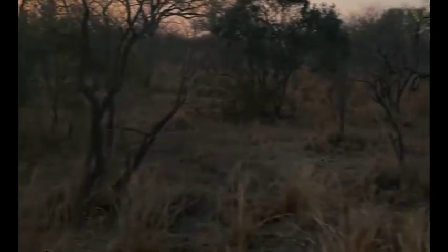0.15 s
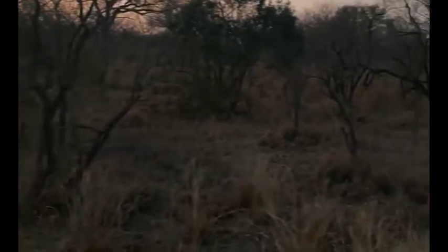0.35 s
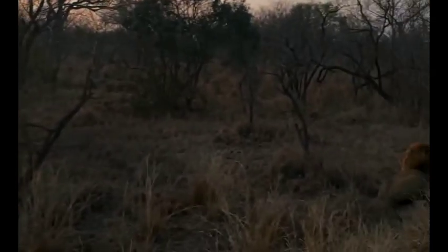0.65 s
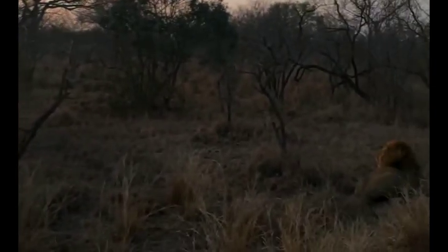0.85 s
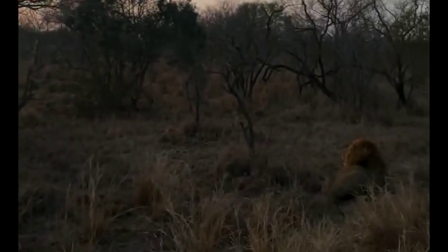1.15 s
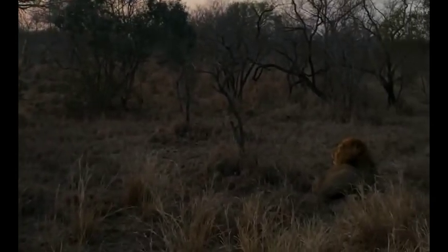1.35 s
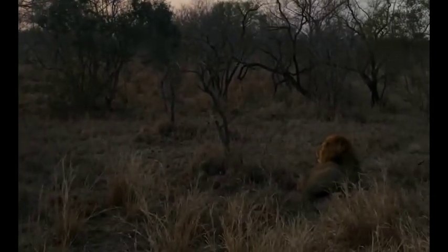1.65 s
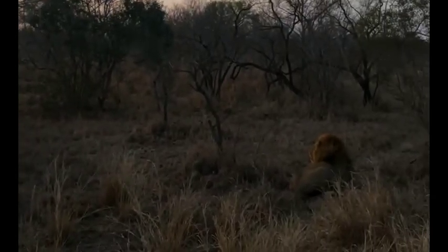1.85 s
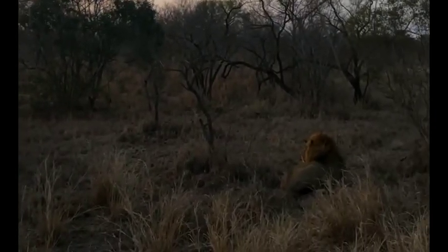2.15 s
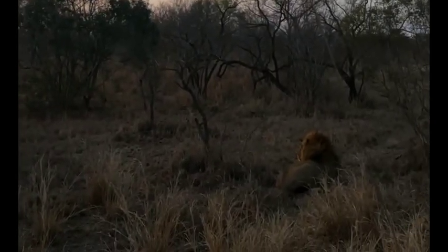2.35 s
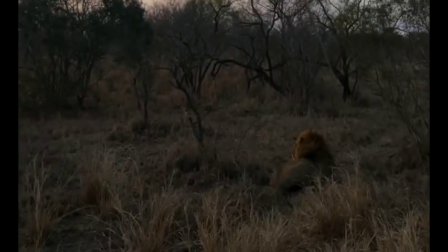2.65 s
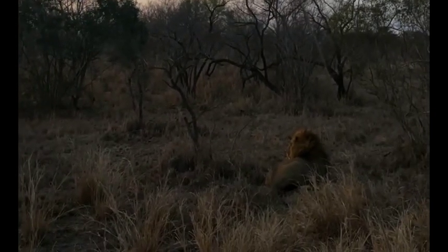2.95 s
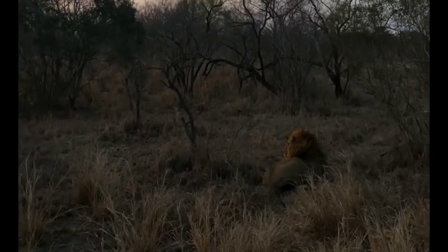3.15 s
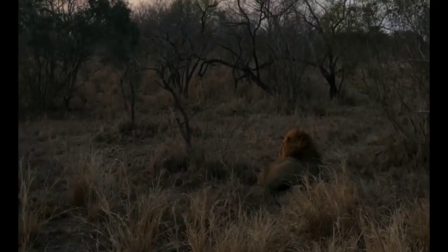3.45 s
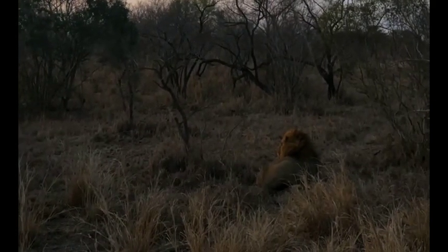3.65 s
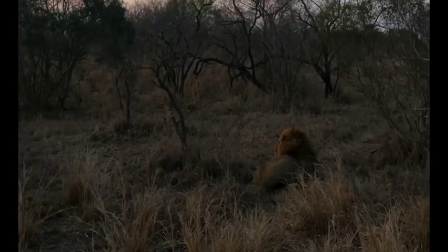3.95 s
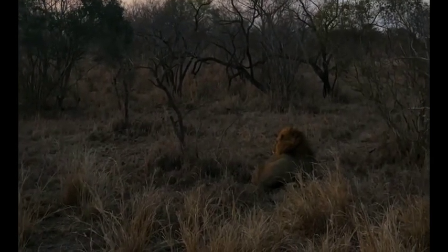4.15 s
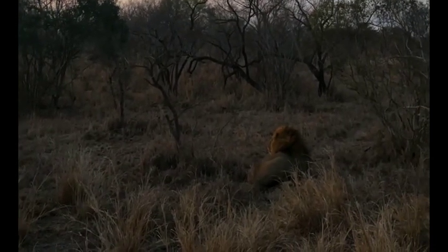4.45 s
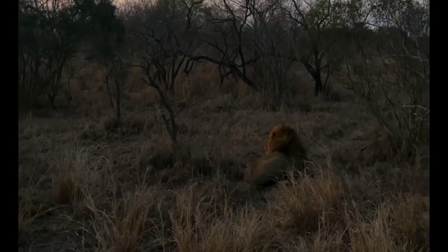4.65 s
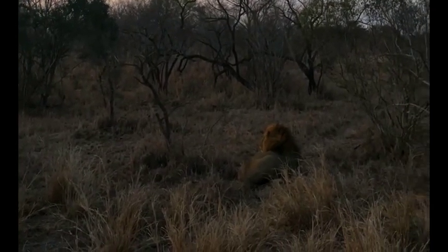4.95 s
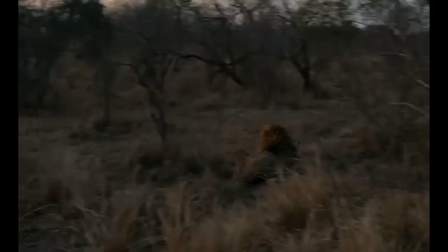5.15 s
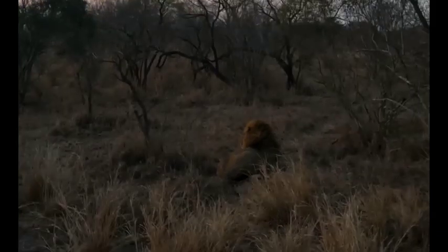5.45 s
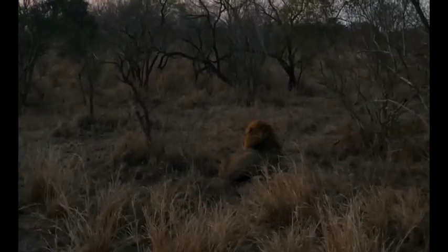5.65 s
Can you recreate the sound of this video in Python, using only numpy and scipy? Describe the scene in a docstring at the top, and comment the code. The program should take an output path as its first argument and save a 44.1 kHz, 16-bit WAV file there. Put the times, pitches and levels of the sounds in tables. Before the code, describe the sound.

A lion calls in open dry bush at dusk. After a short grunt comes a powerful long roar, breaking into a fluttering growl. A weak grunt and soft moan lead into a second strong roar, then a lower, steadier groan and quieter short calls. Breath hisses through the mouth; two tiny dry snaps tick near the end. Stereo microphone, fairly close, with slight scattered reflections and faint insects.

```python
"""Lions roaring in open bush

Each roar is a nearly pure chest tone that glides, throbs and dies away, some calls in a growl.
Clear moans are sums of overtones, shaped by the throat and lips; slaps of the vocal folds and
noise ring the throat as rasp. Breath, harsh catches, a flapping rumble and two dry snaps join in.
Echoes scatter the upper voice to both sides, over faint noise for still air and insects."""
import sys
import numpy as np
from scipy import signal
from scipy.io import wavfile
from scipy.ndimage import uniform_filter1d, minimum_filter1d

SR = 44100
rng = np.random.default_rng(int(sys.argv[2]) if len(sys.argv) > 2 else 0)


def persist_wave(psi):
    """Save psi, clipped to +-1, as 16-bit WAV."""
    counts = np.round(np.clip(psi, -1, 1) * 32767).astype(np.int16)
    wavfile.write(sys.argv[1], SR, np.atleast_2d(counts).T)


N = 255988  # length in samples


def gain_of(db):
    """Turns decibels into an amplitude factor."""
    return 10 ** (np.asarray(db) / 20)


def evened(x):
    """Scales a sound to unit average (RMS) size."""
    return x / np.sqrt(np.mean(x ** 2) + 1e-20)


def read(points, hz):
    """Reads a curve of (Hz, value) points, interpolating along log frequency."""
    f, value = np.transpose(points)
    return np.interp(np.log(hz + 1), np.log(f + 1), value)


def played(rows):
    """The stretch of samples that a table covers, and its columns at every sample there."""
    s, *columns = np.transpose(rows)
    n = np.arange(round(s[0] * SR), min(round(s[-1] * SR), N))
    return slice(n[0], n[-1] + 1), [np.interp(n / SR, s, c) for c in columns]


def fade(n):
    """A level of one with a short soft start and end."""
    return signal.windows.tukey(n, min(1, 900 / n))


def along(tables):
    """A gate that fades each table in and out, then all columns over the whole scene."""
    out, gate = np.zeros((len(tables[0][0]) - 1, N)), np.zeros(N)
    for rows in tables:
        at, columns = played(rows)
        out[:, at] = columns
        gate[at] = fade(len(columns[0]))
    return gate, *out


def wander(n, span):
    """Random drift of unit size: noise averaged twice over span samples."""
    return evened(uniform_filter1d(uniform_filter1d(rng.standard_normal(n), span), span))


def resonate(x, hz, width):
    """A resonance: shifts hz down to zero, smooths twice for steep flanks, and shifts back."""
    turn = np.exp(2j * np.pi * np.cumsum(hz * np.ones(x.shape[-1])) / SR)
    r = np.exp(-np.pi * width / SR)
    shifted = x * turn.conj() + 1e-18
    smooth = signal.lfilter([(1 - r) ** 2], np.convolve([1, -r], [1, -r]), shifted)
    return 2 * (turn * smooth).real


def throat(x, modes):
    """Adds up resonances of (Hz, width Hz, dB), every second one with its sign turned."""
    return sum((-1) ** k * gain_of(db) * resonate(x, hz, w) for k, (hz, w, db) in enumerate(modes))


def coloured(spectrum, same, patchy_db):
    """Two channels of noise with a given spectrum, left-right likeness and drifting patches."""
    frames, hz = N // 256 + 5, np.fft.rfftfreq(1024, 1 / SR)
    a, b, c, d, patches = rng.standard_normal((frames, 513, 5)).T
    patches = evened(uniform_filter1d(uniform_filter1d(patches, 12, 0), 8, 1))
    same = np.clip(same(hz), -1, 1)[:, None]
    left, other = a + 1j * b, c + 1j * d
    z = np.array([left, same * left + np.sqrt(1 - same ** 2) * other])
    z *= gain_of(read(spectrum, hz)[:, None] + patchy_db * patches)
    return evened(signal.istft(z, nperseg=1024, noverlap=768)[1][:, :N])


def scattered(x):
    """Ground and trunks return the upper voice a few ms late, unlike on each side."""
    # Each row: delay in seconds, left level in dB, right level in dB
    returns = [(.0007, -19, -23.5), (.0016, -6.5, -2.5), (.0031, -18, -2.5), (.0054, -5.5, 0),
               (.0090, -4.5, -8.5), (0.015, -15.5, -15.5)]
    out = np.zeros((2, N))
    for s, left_db, right_db in returns:
        late = np.interp(np.arange(N) - s * SR, np.arange(N), x, left=0)
        out += [gain_of(left_db) * late, -gain_of(right_db) * late]
    # thin trunks let the bass pass by
    trunks = signal.sosfilt(signal.butter(2, 330, "high", fs=SR, output="sos"), out)
    return np.array([x, x]) + trunks


def still_air():
    """Still air and insects: steady faint noise, more alike left and right in the bass."""
    # Spectrum. Each row: frequency in Hz, relative level in dB per Hz
    spectrum = [(24, -51), (40, -23.5), (150, 7.5), (260, -24), (522, -22.5), (2450, -32.5), (4460, -30.5),
                (5050, -29.5), (7340, -25.5), (8520, -31.5), (15500, -34.5)]
    # Each row: frequency in Hz, left-right likeness from 0 to 1
    likeness = [(60, 0.99), (300, 0.93), (1000, .2), (8000, 0.093)]
    level_db = -58.5
    return gain_of(level_db) * coloured(spectrum, lambda hz: read(likeness, hz), patchy_db=2.5)


def moan(rows, octave_db, fourth_db, treble_db, halves):
    """Steady pulses of the folds as overtones, shaped by the throat and a sharp mouth resonance."""
    # The throat's response. Each row: frequency in Hz, level in dB
    response = [(500, -3.5), (650, 12), (780, -7.5), (1130, 7.5), (1400, -4.5), (1550, -13), (1700, -37),
                (1900, -11.5), (2150, -36.5), (2350, -16), (2600, -21.5), (2850, -40), (3400, -32),
                (4600, -41), (5600, -29.5), (6600, -38), (7600, -25.5)]
    at, (hz, db, root_db, lips) = played(rows)
    lips_round = lips.clip(0, 1)
    # mouth resonance with lips wide, then round: Hz, lift in dB, share
    mouths = (1100, 9.9, 1 - lips_round), (887, 34.2, lips_round)
    low_db = -12.5 + 0.75 * root_db  # the low overtones partly follow the fundamental
    turns = np.cumsum(hz * (1 + .002 * wander(len(hz), 200))) / SR
    angle = 2 * np.pi * turns
    upper, power, n = 0, 0, np.arange(len(hz))
    slow = n[::32]  # the throat moves slowly, so it is read at every 32nd sample
    for k in range(4, 62):  # k is the multiple of the fundamental
        k_hz = k * hz[slow]
        lift_db = sum(share[slow] * top_db / (1 + ((k_hz - mouth_hz) / 52) ** 2)
                      for mouth_hz, top_db, share in mouths)
        boost_db = treble_db * (k > 12) + fourth_db * (k == 4)
        size = gain_of(read(response, k_hz) + lift_db + boost_db)
        drift = gain_of(min(2.2 + .14 * k, 5) * wander(len(slow), 100))
        hoarse = 1 + .14 * wander(len(slow), 3)
        strength = np.interp(n, slow, size * drift * hoarse)
        upper = upper + strength * np.cos(k * angle - 0.14 * k * k)
        power = power + size ** 2 / 2
    upper = gain_of(db) * upper / np.interp(n, slow, np.sqrt(power))
    octave = gain_of(octave_db + 2 * wander(len(hz), 2500)) * np.cos(2 * angle)
    low = np.sqrt(2) * (np.cos(3 * angle) + octave)
    low *= 1 + 0.042 * wander(len(hz), 200)
    root = np.sqrt(2) * gain_of(root_db) * np.cos(angle)
    pulses = 1 + halves * np.cos(np.pi * turns)  # strong and weak cycles take turns
    return at, fade(len(hz)) * ((upper + gain_of(low_db) * low) * pulses + root)


def clear_moans():
    """Places the moans in time; each has its own balance of overtones."""
    # One table a moan. Each row: time in seconds, pitch in Hz, level of the upper overtones in dB,
    # level of the fundamental in dB, lips from 0 (wide) to 1 (round)
    tables = [
        [(0, 138.9, -31, -33.5, 0.73), (.085, 139.7, -36.5, -30, 0.4), (.135, 149.2, -29, -37.5, 0.7),
         (.255, 145.8, -30.5, -32, 0.72), (.295, 129, -33.5, -46, 0.67), (.45, 131.1, -21.5, -34, 1),
         (.54, 129.4, -26, -31.5, 0.64), (.61, 128.9, -27, -27, 0.01), (.7, 128.6, -28.5, -22.5, 0.74),
         (.79, 136.6, -39.5, -22, 0.49)],
        [(2.2, 127.2, -38.5, -44, 0.65), (2.31, 134.2, -38.5, -41, 0.77), (2.5, 138, -40.5, -46, 0.66),
         (2.655, 138.5, -37, -43, 0.74), (2.71, 134.8, -38, -39, 0.98), (2.775, 129.6, -27, -39.5, 0.81),
         (2.93, 125.8, -22, -25.5, 0.72), (3.0, 126.7, -22.5, -21, 0.67), (3.07, 133.8, -52, -22.5, 0.8)],
        [(5.15, 135.4, -47.5, -42.5, 0.2), (5.21, 133.2, -35, -38.5, 1), (5.375, 134.4, -39, -37.5, 0),
         (5.405, 144.7, -31, -38.5, 0.03), (5.47, 146.4, -30.5, -48.5, 0.76), (5.54, 158, -47, -34, 0.83)],
        [(4.15, 119.5, -54.5, -34.5, .8), (4.22, 118.2, -44, -37, 0.87), (4.47, 118.9, -54.5, -34.5, 0.7)],
    ]
    # One row a moan: second multiple of the pitch over the third in dB, boost of the fourth in dB,
    # boost above the twelfth in dB, contrast of strong and weak pulses from 0 to 1
    colours = [(-1.5, 1.6, 3.5, 0.11), (-8, 0, 4, 0), (-5, 5, -8, .02), (5.5, 12.5, 2, 0.58)]
    out = np.zeros(N)
    for rows, colour in zip(tables, colours):
        at, sound = moan(rows, *colour)
        out[at] = sound
    return out


def breath(turns):
    """Air rushing through the open mouth, slightly pulsed by the voice."""
    # Each row: start in seconds, end in seconds, level at the start in dB, level at the end in dB
    rushes = [(0, 0.52, -60, -55), (0.543, 1.022, -47.5, -41.5), (1.081, 1.482, -58, -54),
              (1.516, 1.798, -47.5, -67.5), (2.213, 2.86, -65, -59), (2.895, 3.325, -45, -43),
              (3.378, 3.497, -56, -66), (4.199, 4.55, -57.5, -55.5), (4.59, 4.85, -59, -68),
              (4.936, 5.807, -60, -62.5)]
    # Each row: frequency in Hz, relative level in dB per Hz
    spectrum = [(1530, -37), (2600, -4), (3450, -5.5), (4550, -9.5), (4980, -7), (7510, -7.5),
                (13500, -18.5), (15500, -29.5)]
    rise, fall = 610, 440  # dB per second before and after a rush
    t = np.arange(N) / SR
    db = np.max([np.interp(t, [a, b], [a_db, b_db]) - rise * (a - t).clip(0) - fall * (t - b).clip(0)
                 for a, b, a_db, b_db in rushes], axis=0)
    noise = coloured(spectrum, lambda hz: 0 * hz, patchy_db=4.0)
    pulse = 1 + 0.12 * np.cos(2 * np.pi * turns)
    return gain_of(db + 0.68 * wander(N, 500)) * pulse * noise


def hoarse_multiples(turns, rough, puffs):
    """The tone is not quite pure: hoarse multiples follow its pitch, a little unlike left and right."""
    hz = uniform_filter1d(np.gradient(turns), 1500) * SR
    low, power = 0, 0
    for k in (2, 3, 4):
        size = 1 / (1 + ((k * hz - 310) / 120) ** 4)  # lowest throat resonance: Hz, half width Hz
        hoarse = .9 + .35 * wander(N, 200) + .5 * np.array([wander(N, 260), wander(N, 260)])
        low = low + size * hoarse * np.cos(2 * np.pi * k * turns)
        power = power + size ** 2 / 2
    band = signal.butter(4, [200, 420], "band", fs=SR, output="sos")
    churn = signal.sosfilt(band, puffs[0] + 1.2 * puffs)
    share = (0.1 + 0.42 * rough).clip(0, 1)  # rough stretches turn the multiples into churning air
    return np.sqrt(1 - share) * low / np.sqrt(power) + np.sqrt(share) * evened(churn)


def rasp(loss_db, turns):
    """Uneven slaps of the folds, one per cycle of the chest tone, and puffs of air ring the throat."""
    # One table a rough stretch. Each row: time in seconds, rasp in dB, mouth resonance in Hz,
    # upper throat in dB, overtones of the chest in dB, roughness from 0 to 1
    stretches = [
        [(.04, -64.5, 906, -74, -33.5, 0.5), (.106, -36, 913, -46, -23.5, 0.8),
         (.16, -51.5, 865, -48, -46.5, 0.2), (.3, -43.5, 900, -58, -44.5, .5)],
        [(.62, -49.5, 914, -62, -36, 0.5), (.8, -26, 945, -39, -27.5, 0.8), (1.03, -36.5, 763, -46.5, -43, 1),
         (1.09, -44.5, 893, -48.5, -31, .4), (1.2, -44.5, 901, -51, -36.5, .3),
         (1.45, -42.5, 860, -41, -29, .35), (1.53, -40.5, 941, -36.5, -26, 0.5), (1.8, -65, 936, -60, -59, 0.7)],
        [(2.07, -77.5, 913, -71, -62, 0.5), (2.124, -40, 895, -63, -38.5, 0.9),
         (2.29, -41, 880, -67, -70.5, 0.8), (2.38, -60, 914, -77, -77, 0.4)],
        [(2.98, -32.5, 906, -72, -48, 0.7), (3.07, -28.5, 916, -47.5, -33.5, 0.8),
         (3.26, -33, 832, -45, -33.5, 0.9), (3.29, -32, 912, -41, -21, 0), (3.36, -42, 842, -48.5, -28, 0.5),
         (3.385, -46, 868, -51.5, -49, 0.9), (3.44, -52, 893, -61, -41.5, 0.8), (3.6, -71, 901, -88.5, -82, 0)],
        [(4.08, -81.5, 935, -70.5, -66, .6), (4.11, -61, 965, -56.5, -43, 0.9),
         (4.2, -40.5, 863, -44, -49, 0.35), (4.32, -45.5, 833, -43.5, -40.5, 0.4),
         (4.46, -39.5, 843, -47.5, -44, 0.6), (4.5, -53.5, 877, -48.5, -19.5, 0.7),
         (4.62, -54, 875.5, -48.5, -44, 0.4), (4.755, -56, 888, -62, -50.5, .5),
         (4.865, -74, 868, -72, -75, 0.2)],
        [(4.87, -72, 921, -72, -58, 0.2), (4.978, -38.5, 924, -49.5, -27.5, 0.3),
         (5.16, -35.5, 904, -59, -43.5, 0.6), (5.23, -47, 950, -61, -64, 0.6)],
        [(5.46, -48, 951, -65, -49, 0.6), (5.55, -28, 869, -56.5, -37, 0.7), (5.65, -41.5, 786, -59, -32, 0.8),
         (5.72, -35.5, 877, -59, -27.5, .6), (5.8, -50, 908, -52, -28, 0.9)],
    ]
    # Each row: multiple of the mouth resonance, width in Hz, level in dB
    mouth_modes = [(.7, 64, -8.5), (1.0, 65, -5), (1.23, 43, 0.5), (1.1, 456, -10)]
    # Each row: frequency in Hz, width in Hz, level in dB
    upper_modes = [(1451, 240, 4), (1870, 570, -5), (2510, 380, -13.5), (3000, 390, -14)]
    gate, db, mouth_hz, upper_db, low_db, rough = along(stretches)
    uneven = turns + .07 * rough * wander(N, 200)
    slaps = np.diff(np.floor(uneven), prepend=0).clip(0, 1)
    slaps = slaps * gain_of(1.5 * rng.standard_normal(N))
    puffs = (0.36 + np.exp(-(uneven % 1) / 2.5)) * rng.standard_normal((2, N))
    share = rough.clip(0, 1)
    drive = np.sqrt(1 - share) * evened(scattered(slaps)) + np.sqrt(share) * evened(puffs)
    drive = drive * gain_of(-.8 * loss_db)
    main = evened(throat(drive, [(m * mouth_hz, w, mode_db) for m, w, mode_db in mouth_modes]))
    main = main * gain_of(2.0 * wander(N, 900))
    upper = evened(throat(drive, upper_modes)) * gain_of(2.1 * wander(N, 900))
    low = hoarse_multiples(turns, rough, puffs)
    return gate * (gain_of(db) * main + gain_of(upper_db) * upper + gain_of(low_db - .5 * loss_db) * low)


def swell(start, top, end, top_db, first_hz, last_hz, haste, slowness):
    """Rows of a short swell: the level arches while the pitch glides up."""
    s = np.linspace(start, end, num=40)
    arch = np.sin(np.pi / 2 * np.interp(s, [start, top, end], [0, 1, 2])).clip(1e-3)
    db = top_db + 20 * np.log10(arch) * np.where(s < top, slowness, 2)  # powers of the arch
    hz = last_hz - (last_hz - first_hz) * ((end - s) / (end - start)) ** haste
    return np.c_[s, hz, db]


def with_tail(rows):
    """Rows of a roar and its tail: every roar dies away alike, settling on one pitch."""
    tail_s, tail_db, bend, tail_hz = .29, -42.5, 1.86, 142
    s, hz, db = rows[-1]
    u = np.linspace(0, 1, num=12)[1:]
    return np.r_[rows, np.c_[s + tail_s * u, hz + (tail_hz - hz) * u, db + tail_db * u ** bend]]


def chest(loss_db, slip):
    """A nearly pure tone with a flapping rumble below; also returns its cycle count."""
    # Each row: start, top and end in seconds, top level in dB, first and last pitch in Hz,
    # haste of the glide, slowness of the rise
    short_swells = [(.062, 0.146, .33, -4.5, 133.5, 192.5, 3.0, 1.34),
                    (2.069, 2.194, 2.335, -19.5, 135.7, 181.6, 1.05, 2.8),
                    (4.892, 5.094, 5.2, -18, 148.7, 170, 3.0, 0.66)]
    # One table a call. Each row: time in seconds, pitch in Hz, level in dB
    roars = [
        [(.69, 133.8, -37), (.735, 142, -16), (.782, 165.3, -3), (.846, 158, -3.5), (.9, 184.3, -5),
         (1.012, 179.9, -7), (1.108, 165, -8.5), (1.16, 180.8, -6), (1.206, 152.2, -9.5), (1.318, 147.2, -3),
         (1.49, 136, -4), (1.542, 150.7, -8), (1.59, 140.7, -14.5)],
        [(3.02, 137.5, -34), (3.086, 150.2, -9.5), (3.122, 156.6, -3.5), (3.238, 155.9, -6),
         (3.278, 144.7, -10), (3.34, 142.9, -27.5), (3.4, 111.2, -19.5), (3.47, 108.8, -31)],
        [(4.08, 128.8, -75), (4.112, 126.8, -22), (4.156, 121.4, -18.5), (4.186, 123.7, -13), (4.284, 124, -9),
         (4.48, 128.5, -8.5), (4.59, 137, -13.5)],
        [(5.43, 149.2, -33), (5.5, 152.8, -27), (5.554, 168.3, -20), (5.616, 168.1, -13.5), (5.7, 151.8, -14),
         (5.784, 147.6, -22)],
    ]
    # The slack folds flap up and settle.
    # Each row: peak time in seconds, peak level in dB, slope on either side in dB per second
    flaps = [(1.009, -20.5, 99), (1.59, -30, 57), (3.33, -21, 76), (4.551, -28, 46), (4.99, -34.5, 183),
             (5.731, -37.5, 157)]
    gate, hz, db = along([with_tail(rows) for rows in roars] + [swell(*row) for row in short_swells])
    hz[hz == 0] = 135  # the folds idle at this rate between calls
    turns = np.cumsum(hz * (1 + .008 * wander(N, 300))) / SR + slip
    level = np.sqrt(2) * gain_of(db - loss_db + 1.1 * wander(N, 350))
    tone = gate * level * np.sin(2 * np.pi * turns)
    # lopsided cycle: a faint octave
    tone += gate * gain_of(db - loss_db - 40.5) * np.cos(2 * 2 * np.pi * turns)
    t = np.arange(N) / SR
    rumble_db = np.max([peak_db - slope * abs(t - s) for s, peak_db, slope in flaps], axis=0)
    rumble = evened(resonate(rng.standard_normal(N), hz=72, width=30))
    return tone + gain_of(rumble_db - 0.85 * loss_db) * rumble, turns


def chest_sides(tone):
    """Two channels of the chest tone; the left is slightly louder and shifts a little in time."""
    # Each row: time in seconds, lateness of the left side in microseconds
    lateness = [(0, 190.5), (2.4, 7), (2.949, 49), (3.099, -170), (3.601, -100), (4.099, 133.5), (4.8, 127),
                (4.951, 5.5)]
    s, lag = np.transpose(lateness)
    n = np.arange(N)
    late = np.interp(n - np.interp(n / SR, s, lag) * SR / 10 ** 6, n, tone)
    return np.array([late * gain_of(0.72), tone])


def catches():
    """The voice catches with a short harsh burst: a puff of air rings the mouth."""
    # Each row: start in seconds, level in dB, frequency in Hz
    bursts = [(0.785, -16.5, 806), (1.14, -39.5, 684), (1.491, -22, 1010), (1.518, -31, 1070),
              (1.599, -39, 748), (3.293, -25, 880), (4.119, -42.5, 961), (4.476, -25.5, 1030),
              (4.494, -27.5, 1030), (4.561, -32.5, 874), (5.704, -29.5, 1046)]
    out, t = np.zeros((2, N)), np.arange(3000) / SR
    for s, db, hz in bursts:
        shared, sides = rng.standard_normal(3000), rng.standard_normal((2, 3000))
        shape = (1 - np.exp(-t / .004)) * gain_of(db - 60 * t / 0.14)  # falls at 60 dB in 0.14 s
        out[:, round(s * SR):][:, :3000] += shape * evened(resonate(shared + .6 * sides, hz, 420))
    return out


def throbs():
    """Loss in dB and slip of the cycle in turns: after a drop-out the folds restart out of step."""
    # Growls: the folds shut in a slow beat and the tone drops out.
    # Each row: first and last time in seconds, beats per second, depth in dB
    growls = [(0.826, .97, 30, 6.5), (1.575, 1.87, 35.9, 11), (3.272, 3.72, 31.5, 12),
              (4.548, 4.86, 33.5, 14)]
    # Single breaks of the voice. Each row: time in seconds, depth in dB
    breaks = [(0.892, 7.5), (1.101, 6.5), (1.48, 8.5), (1.507, 20), (1.569, 10), (4.128, 8), (4.161, 10),
              (4.512, 10), (4.542, 10.5), (4.912, 10.5), (4.953, 14), (5.012, 7.5), (5.047, 11.5),
              (5.727, 14)]
    slip_s, spread = .003, .25  # unevenness of the beat (seconds) and of the depth (share)
    t, loss_db, slip = np.arange(N) / SR, np.zeros(N), np.zeros(N)
    drops = [(*row, rng.uniform(-1, 1)) for row in breaks]
    for first, last, rate, depth_db in growls:
        for k, (a, b, chance) in enumerate(rng.uniform(-1, 1, (20, 3))):
            beat = first + k / rate
            if beat < last:
                drops.append((beat + slip_s * a, depth_db * (1 + spread * b), chance))
    for s, depth_db, chance in drops:
        near = slice(round((s - .03) * SR), round((s + .03) * SR))
        bump = np.exp(-((t[near] - s) / .0075) ** 2)  # half length of a drop-out in seconds
        loss_db[near] += depth_db * bump
        slip[near] += chance * min(depth_db / 30, .5) * bump / bump.sum()
    return loss_db, np.cumsum(slip)


def ticks():
    """Dry stalks snap: a sine with some noise that dies within milliseconds."""
    # Each row: start in seconds, starting level in dB, frequency in Hz
    snaps = [(4.9277, -43, 1990), (4.96, -32, 1950)]
    out, t = np.zeros((2, N)), np.arange(400) / SR
    for s, db, hz in snaps:
        snap = np.sin(2 * np.pi * hz * t) + 0.35 * rng.standard_normal((2, 400))
        out[:, round(s * SR):][:, :400] += gain_of(db - 60 * t / 0.0073) * snap  # 60 dB in 7.3 ms
    return out


def scene():
    """Adds all layers; the chest tone's cycle also drives the rasp and pulses the breath."""
    loss_db, slip = throbs()
    tone, turns = chest(loss_db, slip)
    upper = scattered(clear_moans()) + rasp(loss_db, turns)
    # the middle of the voice arrives stronger on the left
    upper = upper + .4 * np.array([[1], [-1]]) * resonate(upper, hz=950, width=1100)
    return chest_sides(tone) + upper + catches() + breath(turns) + ticks() + still_air()


def record(dry):
    """The microphone drops the deepest bass, a limiter holds the loudest cycles; then the band limit."""
    ceiling, edge_hz = .957, 15730
    heard = signal.sosfilt(signal.butter(3, 56, "high", fs=SR, output="sos"), dry)
    room = minimum_filter1d(np.minimum(1, ceiling / (abs(heard).max(0) + 1e-9)), 801)
    held = heard * uniform_filter1d(room, 400)
    lowpass = signal.firwin(511, edge_hz, window=("kaiser", 9), fs=SR)
    return signal.oaconvolve(held, lowpass[None], "same")


dry = scene()
out = record(dry)
persist_wave(out)
```